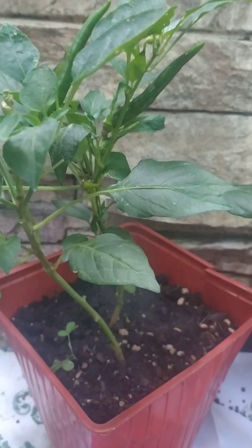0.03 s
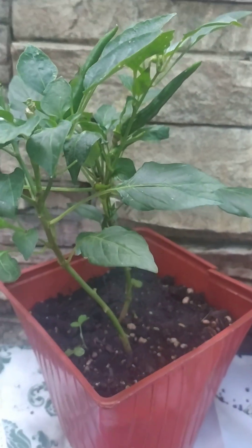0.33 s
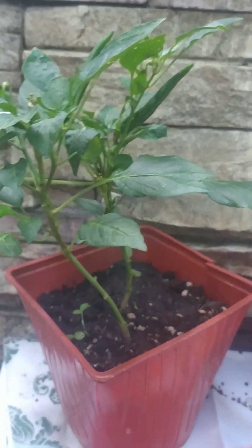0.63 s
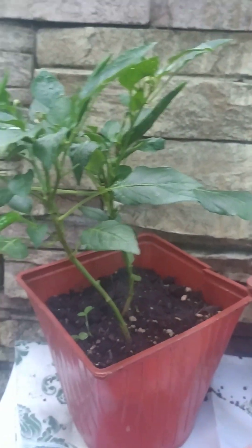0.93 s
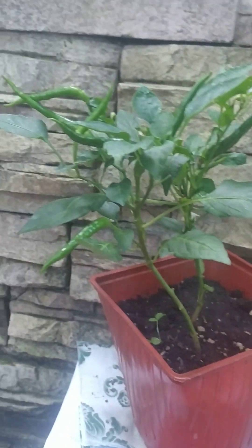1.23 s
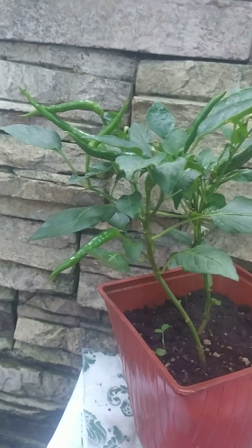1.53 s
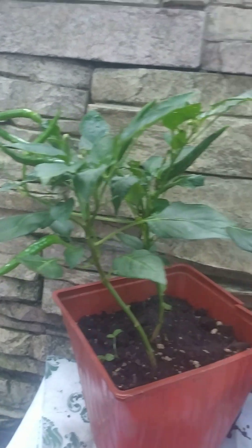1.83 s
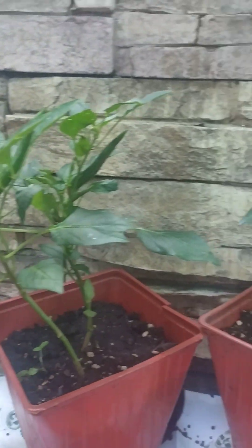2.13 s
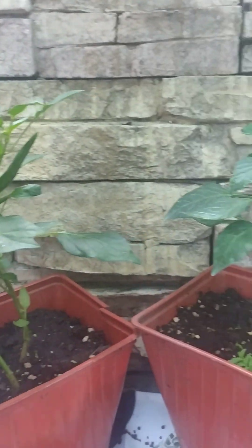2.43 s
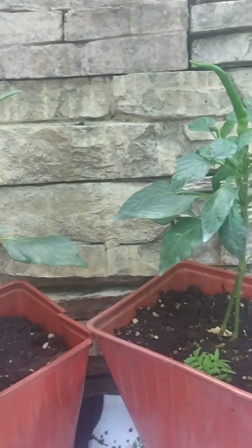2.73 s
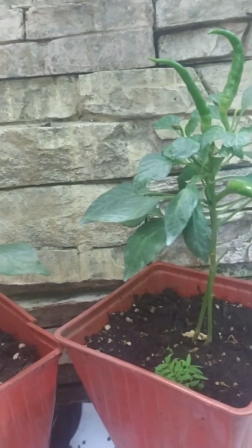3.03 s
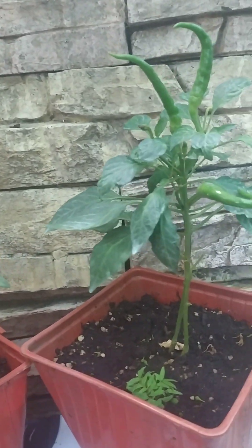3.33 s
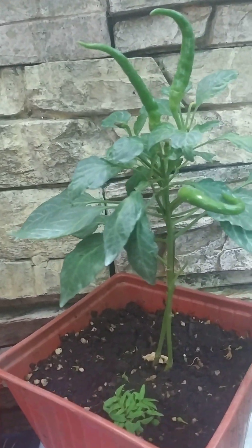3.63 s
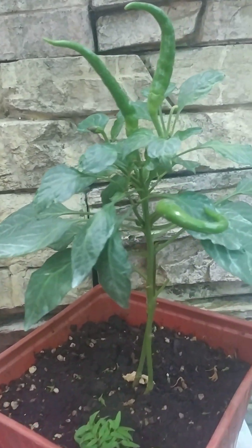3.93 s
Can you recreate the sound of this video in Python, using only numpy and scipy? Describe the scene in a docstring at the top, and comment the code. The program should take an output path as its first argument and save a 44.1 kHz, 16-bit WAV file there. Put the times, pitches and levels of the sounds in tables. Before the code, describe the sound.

Shrill, raspy swift screams overlap outdoors above distant traffic, all on the right. The calls grow sparser, a small bird chirps faintly twice, and a louder scream follows. The left side carries only low microphone handling rumble.

```python
"""Swifts scream above a stone-walled yard with a low town rumble, heard on the right only.
From the start several call at once, each a buzzing whistle that sweeps up, holds, turns raspy and drops,
often with a scratchy crack. From 1.5 s the screams thin and weaken; a faint hiss swells near 2.5 s.
Just after 3 s a sparrow-like bird chirps twice, and a stronger scream and crack end the scene.
Throughout, the left microphone is covered and picks up the hand that holds it."""
import sys
import numpy as np
from scipy import signal
from scipy.fft import rfft, irfft
from scipy.io import wavfile

SR = 44100
rng = np.random.default_rng(int(sys.argv[2]) if len(sys.argv) > 2 else 0)


def wrap_up_sound(samples):
    """Save the sound to the file named by the first command line argument, as 16-bit audio."""
    columns = np.atleast_2d(samples).T
    # keep every value between -1 and 1, then stretch to whole-number steps
    tamed = np.clip(columns, -1, 1)
    steps = np.round(tamed * 32767).astype(np.int16)
    wavfile.write(sys.argv[1], SR, steps)


N = 176400
T = np.arange(N) / SR


def amp(db):
    """Amplitude ratio: a factor of ten for every 20 dB."""
    return 10 ** (np.asarray(db) / 20)


def unit(x):
    """Normalisation to an rms of 1."""
    return x / np.sqrt(np.mean(x ** 2) + 1e-20)


def phase_of(hz):
    """Phase is the time integral of instantaneous frequency."""
    return 2 * np.pi * np.cumsum(hz) / SR


def add(mix, start_s, sound):
    """Superposition: a sound adds to the mix from its start time."""
    at = round(start_s * SR)
    sound = sound[max(-at, 0):]
    part = mix[max(at, 0):][:len(sound)]
    part += sound[:len(part)]


def noise(spectrum):
    """Spectral shaping: white noise takes on a given power density."""
    hz, db = np.transpose(spectrum)
    f = np.fft.rfftfreq(N, 1 / SR)
    gain = amp(np.interp(np.log(f + 1), np.log(hz), db))
    return irfft(rfft(rng.standard_normal(N)) * gain, N) * np.sqrt(SR / 2)


def drift(rate_hz, size):
    """Low-passed noise: a smooth random wander with an rms near 1."""
    span = max(size, SR)
    f = np.fft.rfftfreq(span, 1 / SR)
    return unit(irfft(rfft(rng.standard_normal(span)) / (1 + (f / rate_hz) ** 4), span))[:size]


# Spectrum of the town: frequency_hz, density_db_per_hz
TOWN_SPECTRUM = [(8, -72.3), (20, -74.3), (35, -64.2), (55, -71.1), (90, -72.4), (135, -80.3), (185, -77.4),
                 (218, -70.8), (255, -75.0), (300, -79.0), (400, -79.3), (500, -85), (900, -85.6),
                 (1400, -90.4), (2200, -93.8), (3200, -99.6), (4000, -100.5), (7000, -104.8), (9200, -99.2),
                 (10500, -108.3), (13000, -122.2)]
# Its slow swell: time_s, gain_db
TOWN_SWELL = [(0, 0), (1.2, 0), (2.2, -0.5), (2.8, 1), (4, 0)]
# Envelope of a far tone: time_s, level_db
FAR_TONE = [(0, -65), (.15, -56), (.4, -65), (.8, -72), (1.2, -87)]
def town():
    """Broadband noise of distant traffic, strongest in the bass, with a faint tone that dies away."""
    wash = noise(TOWN_SPECTRUM) * amp(np.interp(T, *np.transpose(TOWN_SWELL)) + .5 * drift(9.3, N))
    tone = np.sqrt(2) * np.sin(phase_of(792 + 4 * drift(21, N)))
    return wash + tone * amp(np.interp(T, *np.transpose(FAR_TONE)))


# Spectrum of the high hiss: frequency_hz, relative_db
HISS_SPECTRUM = [(5000, -35), (7800, -14), (9200, 0), (10500, -8), (13000, -25)]
def hiss(peak_s=2.47, half_width_s=.14, level_db=-60):
    """A band of noise swells and fades once under a Gaussian envelope."""
    return amp(level_db) * np.exp(-2 * ((T - peak_s) / half_width_s) ** 2) * unit(noise(HISS_SPECTRUM))


# Noise floor of the covered microphone: frequency_hz, density_db_per_hz
COVERED_SPECTRUM = [(5, -48), (12, -47), (22, -58), (50, -63), (90, -71), (130, -79), (160, -76),
                    (300, -89), (500, -97), (900, -106), (2700, -112), (3500, -116), (8500, -119),
                    (10000, -123), (13000, -124)]
# Course of the hand's rumble: time_s, gain_db
GRIP_GAIN = [(0, 0.5), (.45, 2), (.6, 5.5), (.85, 6), (1.1, -1), (4, 2.5)]
# The hand shifts on the case: peak_s, level_db, half_width_s
HAND_BUMPS = [(0.351, -41, 0.026), (0.65, -54, 0.04), (0.858, -45, 0.04), (0.966, -53, .03),
              (1.474, -53, 0.063), (1.778, -46, 0.041), (2.137, -51.5, 0.033), (2.497, -54.5, 0.075),
              (2.96, -53, 0.07), (3.264, -46.5, 0.017), (3.48, -53, .04)]
# Spectrum of a bump: frequency_hz, relative_db
BUMP_SPECTRUM = [(20, -15), (110, -3), (170, -4), (300, -5.5), (450, -20.5), (800, -41), (2000, -72)]
def hand():
    """Structure-borne sound: the hand's rumble and bumps reach the covered microphone, over its hiss."""
    floor = noise(COVERED_SPECTRUM)
    low = signal.sosfiltfilt(signal.butter(2, 600, fs=SR, output="sos"), floor)
    rumble = low * amp(np.interp(T, *np.transpose(GRIP_GAIN)) - 3.5 + 2.9 * drift(16, N))
    bumps = sum(amp(db) * np.exp(-2 * ((T - peak_s) / width_s) ** 2) for peak_s, db, width_s in HAND_BUMPS)
    return floor - low + rumble + bumps * unit(noise(BUMP_SPECTRUM))


# Reflections from the stone walls: delay_s, gain_db
WALL_ECHOES = [(.0023, -14.5), (.0061, -14), (0.0138, -16)]
def yard(sound, t60_s=.38, tail_db=-6):
    """Reverberation: early reflections, timed anew for each caller's spot, and a decaying diffuse tail."""
    t = T[:SR // 2]
    response = rng.standard_normal(len(t)) * amp(-60 * t / t60_s) * np.minimum(t / .0066, 1)
    response *= amp(tail_db) / np.linalg.norm(response)
    for delay_s, gain_db in WALL_ECHOES:
        response[round(delay_s * rng.uniform(.8, 1.2) * SR)] += amp(gain_db)
    response[0] += 1  # direct path
    return signal.fftconvolve(sound, response / np.linalg.norm(response))


# Sparrow-like notes, two to a chirp: start_s, length_s, level_db, pitch_hz, overtone_step_db
CHIRP_NOTES = [(3.129, .039, -55, 4100, -7), (3.15, .085, -53, 2673, -11), (3.279, .047, -56.5, 3470, -12),
               (3.296, .066, -56, 2610, -11)]
def chirp(length_s, level_db, pitch_hz, overtone_step_db):
    """Random frequency modulation makes a short note of three harmonics harsh."""
    t = np.arange(0, length_s, 1 / SR)
    phase = phase_of(pitch_hz * (1 + .129 * drift(687, len(t))))
    voice = sum(amp(overtone_step_db * k) * np.sin((k + 1) * phase) for k in range(3))
    return amp(level_db) * unit(voice * np.sin(np.pi * t / length_s) ** .5)


def trilling(size, rate_hz=289, wander=.1605):
    """The modulator of a swift's buzz: a fast, uneven sine whose rate differs from call to call."""
    call_hz = rate_hz * (1 + .08 * rng.uniform(-1, 1))
    return np.sin(phase_of(call_hz * (1 + wander * drift(29.3, size))))


def rasping(phase, rattle_hz, sidebands, jitter_hz=340):
    """Modulation by a slower, unsteady vibration puts sidebands around the whistle."""
    rattle = phase_of(rattle_hz + jitter_hz * drift(899, len(phase)))
    return unit(sum(amp(db) * np.sin(phase + k * rattle) for k, db in sidebands))


# Sidebands of a crack: rattle_multiple, relative_db
CRACK_SIDEBANDS = [(-1, -8), (1, 0), (2, -5)]
# Voice breaks, mostly as a scream ends: start_s, length_s, level_db, pitch_hz, fall_hz, rattle_hz, rasp_db
VOICE_CRACKS = [ (.42, .055, -46.5, 5300, 700, 1700, -20), (.578, .1, -42, 6050, 0, 1780, 0),
                (.79, .075, -42.5, 5400, 450, 2700, -20), (1.132, .055, -53, 4420, 0, 1700, -16),
                (1.835, .11, -61, 4600, 0, 1700, -20), (2.33, .11, -56, 5500, 400, 1700, -20),
                (2.757, .065, -55, 4780, 100, 1700, -20), (3.555, .07, -59, 4900, 250, 1700, -20),
                (3.983, .03, -41, 5480, 200, 2650, -13)]
def crack(length_s, level_db, pitch_hz, fall_hz, rattle_hz, rasp_db, swing_hz=200, jitter_hz=120):
    """The voice breaks: frequency and amplitude modulation give a scratchy, stuttering tone."""
    t = np.arange(0, length_s, 1 / SR)
    progress, n = t / length_s, len(t)
    trill = trilling(n)
    phase = phase_of(pitch_hz - fall_hz * progress + swing_hz * trill + jitter_hz * drift(500, n))
    voice = np.sqrt(2) * np.sin(phase) + amp(rasp_db) * rasping(phase, rattle_hz, CRACK_SIDEBANDS)
    stutter = (1 + .5 * trill) * amp(2 * drift(90, n))
    return amp(level_db) * unit(voice * stutter * np.abs(np.sin(np.pi * progress)) ** .5)


# Sidebands of a scream's rasp: rattle_multiple, relative_db
RASP_SIDEBANDS = [(-1, -14), (1, 0), (2, -4)]
# Swift screams (fractions are of the length): start_s, length_s, level_db, top_hz, sweep_hz, sweep_s,
# drop_hz, crest_fraction, octave_db, doubling_db, doubling_fraction, rasp_db, rasp_fraction, swing_hz
SWIFT_SCREAMS = [ (-.25, .39, -36, 6590, 1300, .046, 1900, .6, -15, -26, .8, -22, .3, 210),
                 (.162, .37, -36, 6280, 1380, .068, 97, .26, -20, -10, .24, -15, .5, 170),
                 (.222, .23, -39.5, 5980, 1100, .055, 700, .4, -22, -13, .3, -9, .55, 230),
                 (.477, .385, -34.5, 6080, 1150, .052, 1280, .48, -19, -9, .24, -19, .62, 190),
                 (.518, .28, -41, 6120, 1300, .045, 500, .22, -12, -10, .2, -9, .3, 300),
                 (.832, .29, -34.5, 6077, 980, .085, 950, .36, -17, -8, .33, -14, .54, 170),
                 (1.14, .37, -38.5, 6050, 1150, .045, 1450, .42, -22, -19, .4, -16, .5, 250),
                 (1.183, .42, -38, 6350, 1600, .15, 596, .28, -19, -18, .25, -13, .49, 330),
                 (1.528, .33, -44.5, 6030, 1002, .13, 96, .5, -28, -15, .5, -15, .1, 310),
                 (1.732, .36, -40, 5870, 1750, .05, 308, .38, -18.5, -28, .5, -23, .6, 150),
                 (1.904, .33, -43, 5950, 1300, .08, 400, .5, -26, -27, .5, -22, .73, 270),
                 (2.08, .35, -48, 6000, 600, .05, 850, .4, -28, -28, .5, -24, .6, 270),
                 (2.463, .34, -53, 5270, 1300, .045, 295, .3, -18, -16, .6, -18, .5, 190),
                 (2.925, .39, -49.5, 6130, 1350, .045, 200, .22, -30, -32, .2, -22, .42, 300),
                 (3.345, .26, -58, 5350, 1000, .08, 200, .55, -23, -25, .5, -18, .5, 220),
                 (3.685, .38, -43, 5650, 1500, .058, 350, .55, -21, -25, .7, -13, .55, 160)]
def scream(length_s, level_db, top_hz, sweep_hz, sweep_s, drop_hz, crest_fraction,
           octave_db, doubling_db, doubling_fraction, rasp_db, rasp_fraction, swing_hz):
    """A trill modulates a gliding whistle; period doubling adds a tone at 1.5 times its pitch."""
    attack_s, release_s, drop_s, rasp_onset_s = .02, .018, .12, .028
    onset_db, end_db, throat_db_per_hz = -9, -11, .0033
    t = np.arange(0, length_s, 1 / SR)
    progress, n = t / length_s, len(t)
    trill = trilling(n)
    sweep_left = np.exp(-t / sweep_s)
    below_top_hz = sweep_hz * sweep_left + drop_hz * np.maximum(1 - (length_s - t) / drop_s, 0) ** 1.4
    buzz_hz = swing_hz * (.8 + .2 * progress) * trill
    jitter_hz = 45 * drift(397, n) + 45 * drift(44.2, n)
    phase = phase_of(top_hz - below_top_hz + buzz_hz + jitter_hz)

    whistle = amp(-throat_db_per_hz * below_top_hz) * np.sin(phase)  # weaker below its top pitch
    doubling = np.sin(1.5 * phase + phase_of(120 * drift(600, n)))
    doubling *= amp(doubling_db - 32 * np.abs(progress - doubling_fraction))
    octave = np.sin(2 * phase + phase_of(130 * drift(900, n)))  # phase noise makes it ragged
    octave *= amp(octave_db - 15 * (progress - crest_fraction))
    hoarse = drift(620, n) * np.sin(phase) + drift(620, n) * np.cos(phase)  # noise around the pitch
    hoarse *= amp(-17 + 2 * sweep_left)
    rasp = amp(rasp_db) * rasping(phase, rattle_hz=1700, sidebands=RASP_SIDEBANDS)
    rasp *= (1 + np.tanh((t - rasp_fraction * length_s) / rasp_onset_s)) / 2
    voice = np.sqrt(2) * (whistle + octave + doubling) + hoarse + rasp

    rise_db = onset_db * (1 - progress / crest_fraction) ** 2
    fall_db = end_db * np.abs((progress - crest_fraction) / (1 - crest_fraction)) ** 1.48
    swell_db = np.where(progress < crest_fraction, rise_db, fall_db)
    edges = np.minimum(np.minimum(t / attack_s, (length_s - t) / release_s), 1)
    flutter_db = (2.1 + 2.2 * progress ** 3) * drift(70, n)  # the call breaks up as it falls
    return voice * (1 + .35 * trill) * edges * amp(level_db + swell_db + flutter_db)


def birds(treble_cutoff_hz=11900, port_hz=9400, port_db=-5):
    """A steep low-pass takes the highest treble off the echoing calls; the microphone port resonates."""
    calls = np.zeros(N)
    for voice, table in ((scream, SWIFT_SCREAMS), (crack, VOICE_CRACKS), (chirp, CHIRP_NOTES)):
        for start_s, *settings in table:
            add(calls, start_s, yard(voice(*settings)))
    dulled = signal.sosfilt(signal.butter(6, treble_cutoff_hz, fs=SR, output="sos"), calls)
    return dulled + amp(port_db) * signal.lfilter(*signal.iirpeak(port_hz, Q=5, fs=SR), dulled)


def scene():
    """Two separate channels: the hand on the left, the superposed sounds of the yard on the right."""
    return np.array([hand(), birds() + town() + hiss()])


def record(dry, cutoff_hz=13000):
    """Band limiting: the recorder acts as a linear-phase low-pass filter."""
    lowpass = signal.firwin(255, cutoff_hz, window=("kaiser", 9), fs=SR)
    return signal.oaconvolve(dry, lowpass[None], "same")


dry = scene()
out = record(dry)
wrap_up_sound(out)
```